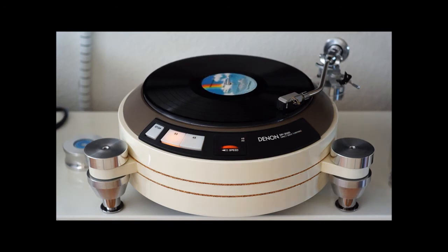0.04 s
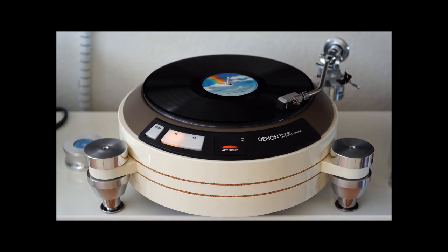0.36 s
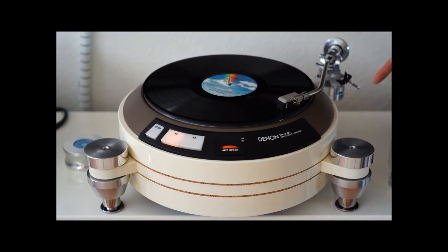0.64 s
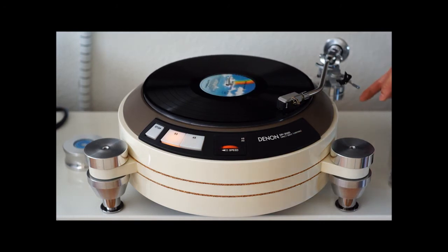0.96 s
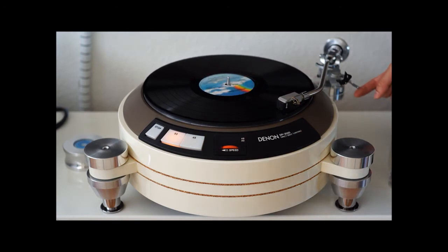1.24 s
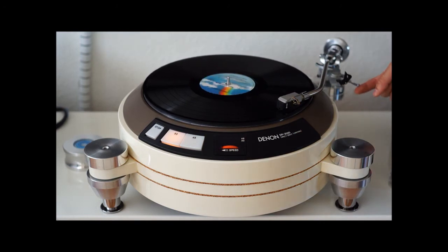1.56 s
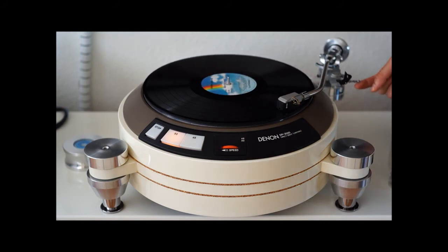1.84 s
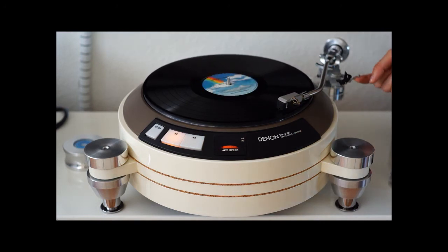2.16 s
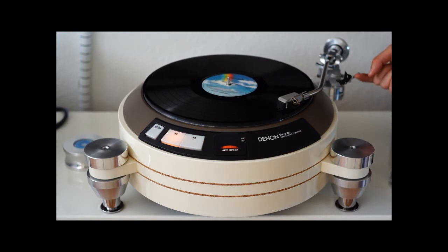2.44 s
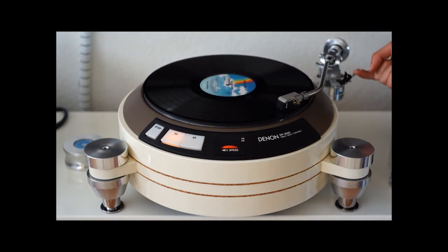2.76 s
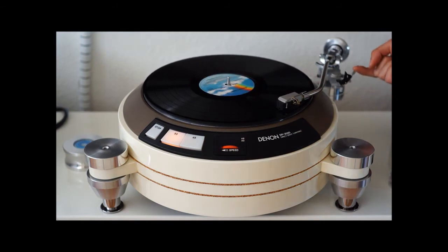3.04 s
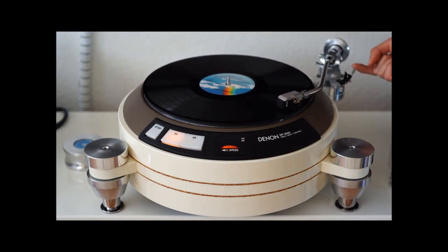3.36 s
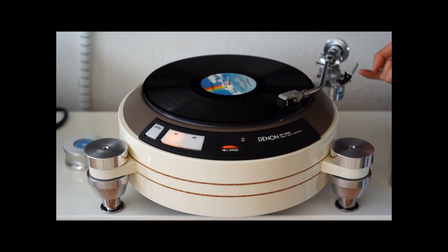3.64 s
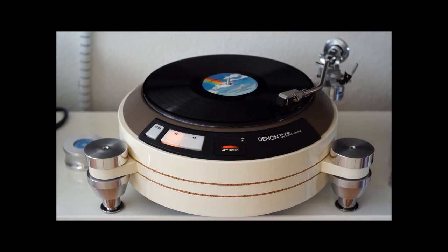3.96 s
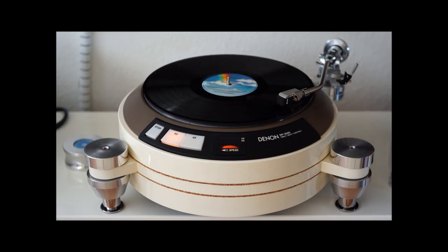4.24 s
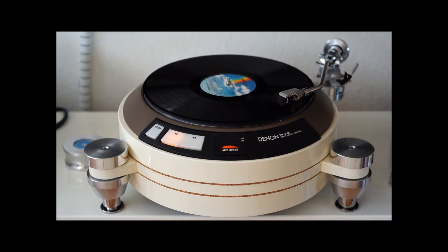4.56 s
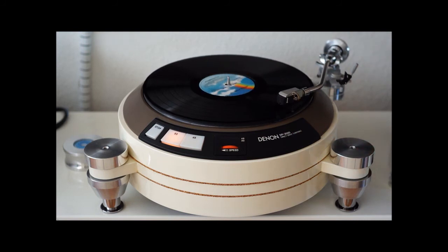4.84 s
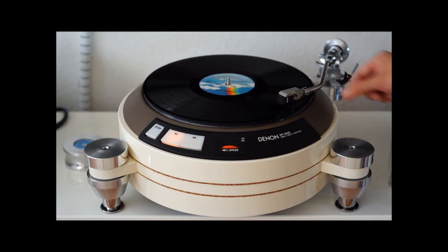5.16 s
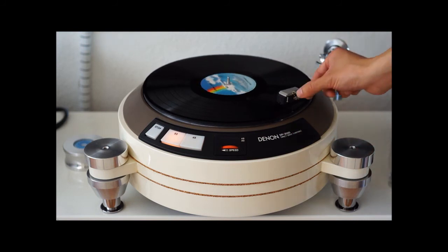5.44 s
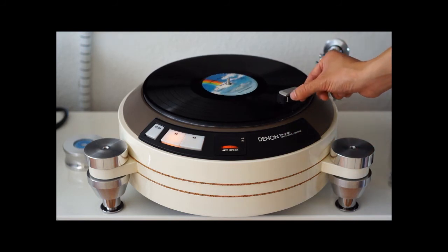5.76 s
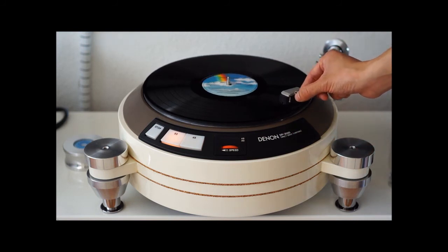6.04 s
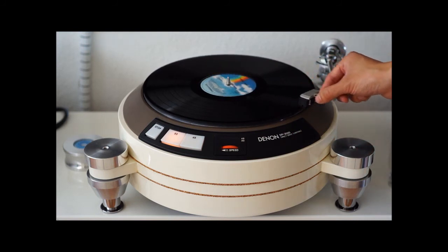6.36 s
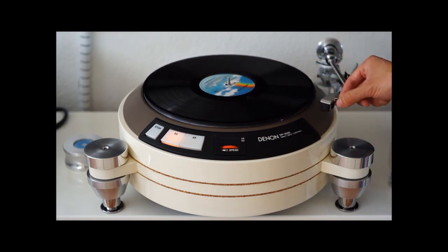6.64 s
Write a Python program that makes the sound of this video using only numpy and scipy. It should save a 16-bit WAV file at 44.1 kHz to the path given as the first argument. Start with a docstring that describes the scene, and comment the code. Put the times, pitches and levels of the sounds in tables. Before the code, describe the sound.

A switch click, then steady electrical hum, rumble and hiss from a record player, with small metal ticks and one soft, deep bump.

```python
"""First comes a turntable's mains hum, after half a second of silence, with low rumble and amplifier hiss.
A faint motor whine swells about once a second. A switch snaps just after the sound comes on.
Later fingers rub lightly on the lever, the lever ticks, and the tonearm gives a soft, deep bump.
The small, quiet room answers each click. Near the end everything eases down a little,
and the fingers rub once more, on the arm."""
import sys
import numpy as np
from scipy import signal
from scipy.fft import rfft, irfft, next_fast_len
from scipy.io import wavfile
from scipy.ndimage import map_coordinates

SR = 44100
rng = np.random.default_rng(int(sys.argv[2]) if len(sys.argv) > 2 else 0)


def store_wav(level_fs):
    """Save 16-bit WAV to argv[1]."""
    pcm = np.round(np.clip(np.atleast_2d(level_fs), -1, 1) * 32767)
    wavfile.write(sys.argv[1], SR, pcm.T.astype(np.int16))


N = 304731
TOP_HZ = 11060  # the highest pitch kept


def amp(db):
    """Turn decibels into a number to multiply by."""
    return 10 ** (np.asarray(db) / 20)


def unit(x):
    """Scale a sound so its average strength (rms) is 1."""
    return x / np.sqrt(np.mean(x ** 2) + 1e-20)


def along(points, hz):
    """Read between the rows of a (pitch_hz, value) table, with octaves evenly spaced."""
    pitches, values = np.transpose(points)
    return np.interp(np.log(hz + 1), np.log(pitches + 1), values)


def wobble(rate_hz):
    """A smooth curve through rate_hz random points a second."""
    points = rng.standard_normal(int(N * rate_hz / SR) + 4)
    return map_coordinates(points, [np.arange(N) * rate_hz / SR])


def filtered(x, gain_at):
    """Turn each pitch in x up or down by gain_at(hz)."""
    size = next_fast_len(N + SR // 2)
    return irfft(rfft(x, size) * gain_at(np.fft.rfftfreq(size, 1 / SR)), size)[..., :N]


def noise(colour):
    """Noise of strength 1. Its colour says how strong each pitch is next to the others."""
    return unit(filtered(rng.standard_normal(N), lambda hz: amp(along(colour, hz))))


# The tones in the hum: multiple_of_mains, level_db
HUM_TONES = [(1, -50), (2, -70), (3, -43), (4, -61.5), (5, -61.5)]

def hum(mains_hz=49.995):
    """Mains power hums at whole multiples of one pitch, all in step."""
    t = np.arange(N) / SR
    return np.sqrt(2) * sum(amp(db) * np.cos(2 * np.pi * k * mains_hz * t) for k, db in HUM_TONES)


# The colours of the turntable's rumble, the room's air and the amplifier's hiss: pitch_hz, level_db
RUMBLE_COLOUR = [(8, -2), (16, 7), (25, -10), (32, -8), (40, -1), (55, -6.5), (72, -1), (90, -3), (130, -7),
                 (240, -8.5), (330, -15), (600, -22.5), (1500, -51)]
AIR_COLOUR = [(40, -26), (100, -35), (150, -12.5), (210, 3), (300, -0.5), (450, -4), (700, -5), (1000, -9),
              (1500, -13.5), (3000, -18.5), (6000, -23.5), (11000, -27)]
HISS_COLOUR = [(100, -22), (500, 0), (1500, 2.5), (3000, 1.5), (6000, 1.5), (11000, 1)]

def background(rumble_db=-52.6, air_db=-61.0, hiss_db=-62.5):
    """Rumble and air drift a little under a steady hiss. Only the air differs from ear to ear."""
    drift_db = 0.74 * wobble(1.5)
    rumble = amp(rumble_db + drift_db) * noise(RUMBLE_COLOUR)
    air = amp(air_db + drift_db) * np.array([noise(AIR_COLOUR), noise(AIR_COLOUR)])
    return rumble + air + amp(hiss_db) * noise(HISS_COLOUR)


# The motor's tones, and the colour of the soft rush under them: pitch_hz, level_db
MOTOR_TONES = [(432, -85.5), (548, -81.5), (655, -82.5), (981, -79.5)]
RUSH_COLOUR = [(200, -40), (450, 4), (800, 3), (1100, 2.5), (1600, -30), (4000, -18)]

def motor_whine(period_s=0.925, crest_s=1.045):
    """Thin, unsteady tones and a soft rush swell together, about twice per turn of the platter."""
    t = np.arange(N) / SR
    swell = np.cos(2 * np.pi * (t - crest_s) / period_s)
    tones = np.zeros(N)
    for hz, db in MOTOR_TONES:
        strength = np.sqrt(2) * amp(db + 2.0 * wobble(4.03))
        tones += strength * np.sin(2 * np.pi * hz * t + 1.97 * wobble(16))
    rush = unit(noise(RUSH_COLOUR) + 0.86 * np.array([noise(RUSH_COLOUR), noise(RUSH_COLOUR)]))
    return amp(-4 + 7 * swell) * tones + amp(-72.5 + 1.5 * swell) * rush


def causal(gain):
    """A spectrum with these gains whose sound comes as early as it can (minimum phase)."""
    cepstrum = irfft(np.log(np.maximum(gain, 1e-6)))
    half = len(cepstrum) // 2
    cepstrum[1:half] *= 2
    cepstrum[half + 1:] = 0
    return np.exp(rfft(cepstrum))


def snap(colour, tilt_db):
    """One clean click of energy 1, made brighter by tilt_db per octave."""
    hz = np.fft.rfftfreq(SR // 2, 1 / SR)
    octaves = np.log2(np.clip(hz, 500, TOP_HZ) / TOP_HZ)
    top_cut_db = 30 * np.clip(hz / TOP_HZ - 1, 0, 1)
    pulse = irfft(causal(amp(along(colour, hz) + tilt_db * octaves - top_cut_db)))
    return pulse / np.linalg.norm(pulse)


def contact(colour, tilt_db, grit, grit_s):
    """Hard parts meet and chatter, spreading a click over a millisecond or so."""
    t = np.arange(SR // 10) / SR
    chatter = rng.standard_normal(len(t)) * np.exp(-t / grit_s)
    force = grit * chatter / np.linalg.norm(chatter)
    force[0] += 1  # the first hit
    spectrum = rfft(force)
    spread = irfft(spectrum / causal(np.abs(spectrum)))  # changes the timing but not the colour
    return signal.fftconvolve(snap(colour, tilt_db), spread[:len(t) // 2])


# How long the room's echo takes to fade by 60 dB: pitch_hz, fade_s
ROOM_FADE = [(100, 1), (700, 0.56), (2500, 0.75), (6000, 0.52), (11000, 0.57)]

def in_room(sound, wet_db, side_db, build_s, wall_s, wall_db):
    """The sound itself, one echo off a wall, and a wash of echoes that builds up and dies away."""
    hz, t, bands = signal.stft(rng.standard_normal((2, SR)), SR, nperseg=256)
    fade = amp(-60 * t / along(ROOM_FADE, hz)[:, None])
    tail = signal.istft(bands * fade, SR, nperseg=256)[1]
    mid, side = tail * (1 - np.exp(-np.arange(tail.shape[1]) / SR / build_s))
    side = amp(side_db) * side  # how much the two ears differ
    answer = amp(wet_db) * np.array([mid + side, mid - side]) / np.linalg.norm(mid)
    answer[:, 0] += 1  # the sound itself
    answer[:, round(wall_s * SR)] += amp(wall_db)
    return signal.fftconvolve(sound[None], answer, axes=1)


def add(track, start_s, sound):
    """Mix a sound into the track at start_s."""
    start = round(start_s * SR)
    track[..., start:start + sound.shape[-1]] += sound[..., :N - start]


# The switch's two clicks: start_s, level_db
SWITCH_CLICKS = [(0.5737, -23), (0.5783, -18.5)]
# Their colour: pitch_hz, level_db
CLICK_COLOUR = [(150, -7), (450, -2.5), (800, 1.5), (1200, -1.5), (1800, -1.5), (2900, -1), (4200, -5),
                (5500, -8.5), (7500, -12.5), (11000, -21.5)]

def switch():
    """The switch touches lightly, then snaps, and the snap fills the room."""
    out = np.zeros((2, N))
    for start_s, db in SWITCH_CLICKS:
        click = amp(db) * contact(CLICK_COLOUR, tilt_db=-0.5, grit=0.97, grit_s=0.00082)
        heard = in_room(click, wet_db=5, side_db=-9, build_s=0.0037, wall_s=0.0228, wall_db=-8)
        add(out, start_s, heard)
    return out


# Fingers rubbing the lever and the arm: start_s, length_s, level_db
FINGER_RUBS = [(1.574, 0.15, -68), (6.233, 0.16, -69.5)]
# Their colour: pitch_hz, level_db
FINGER_COLOUR = [(1000, -35), (2500, -17), (3100, 0), (3600, -9), (4300, -24), (8000, -38)]

def finger_rubs(rise_s=0.026, side_db=-6):
    """Light rubbing makes a thin hiss that rises quickly and dies away."""
    t = np.arange(N) / SR
    strokes = np.zeros(N)
    for start_s, length_s, db in FINGER_RUBS:
        strokes += amp(db) * np.sqrt(np.interp(t, [start_s, start_s + rise_s, start_s + length_s], [0, 1, 0]))
    mid = noise(FINGER_COLOUR)
    side = amp(side_db) * noise(FINGER_COLOUR)
    return strokes * unit(np.array([mid + side, mid - side]))


# The lever's ticks, with the fourth row (2.4521 s) an echo of the first tick off a wall: start_s, level_db,
# brightness_db_per_octave
LEVER_TICKS = [(2.4248, -29, 10), (2.4288, -29.5, -3), (2.4355, -35.5, -10.5), (2.4521, -34.5, 2),
               (2.848, -37, 11)]
# Their colour: pitch_hz, level_db
TICK_COLOUR = [(200, -23), (700, 4), (1400, 10), (3000, 9.5), (6000, 5), (11000, -4)]

def lever(left_db=0.76):
    """Small metal parts tick as a finger moves the tonearm's lever, a little to the left."""
    out = np.zeros((2, N))
    for start_s, db, tilt_db in LEVER_TICKS:
        tick = amp(db) * contact(TICK_COLOUR, tilt_db, grit=0.61, grit_s=0.0012)
        heard = in_room(tick, wet_db=4, side_db=-8, build_s=0.0013, wall_s=0.016, wall_db=-14)
        add(out, start_s, heard)
    return out * amp([[left_db], [-left_db]])


# Soft pushes from the tonearm, heard as one bump: peak_s, level_db, pitch_hz
ARM_PUSHES = [(3.0624, -31.5, 143.5), (3.0851, -28.5, 70.5), (3.157, -38, 60.5)]

def tonearm_bump(ring_hz=82, ring_db=-13, ring_fade_s=0.52):
    """Each push is about one wave long and leaves the turntable's base ringing low."""
    out = np.zeros(N)
    for peak_s, db, hz in ARM_PUSHES:
        t = np.arange(N) / SR - peak_s
        steepness = np.where(t < 0, 1.9, 1.0)  # the push rises faster than it relaxes
        push = np.cos(2 * np.pi * hz * t) * np.exp(-(steepness * hz * t) ** 2)
        after = np.maximum(t, 0)
        ring = -np.sin(2 * np.pi * ring_hz * after) * amp(ring_db - 60 * after / ring_fade_s)
        mismatch = 1 + (2 * np.log2(hz / ring_hz)) ** 2  # the base rings best near its own pitch
        out += amp(db) * (push + ring / mismatch)
    return out


def scene():
    """The running turntable and the small sounds of handling it."""
    running = hum() + motor_whine() + background()
    return running + switch() + finger_rubs() + lever() + tonearm_bump()


def record(dry, on_s=0.556, hold_db=0.87, ease_from_s=3.82, ease_db_per_s=0.9):
    """The sound comes on, holds, then slowly eases down. Pitches above TOP_HZ are cut."""
    t = np.arange(N) / SR
    on = np.clip((t - on_s) / 0.002, 0, 1)
    level = amp(hold_db - ease_db_per_s * np.maximum(t - ease_from_s, 0))
    return filtered(dry * on * level, lambda hz: hz < TOP_HZ)


dry = scene()
out = record(dry)
store_wav(out)
```